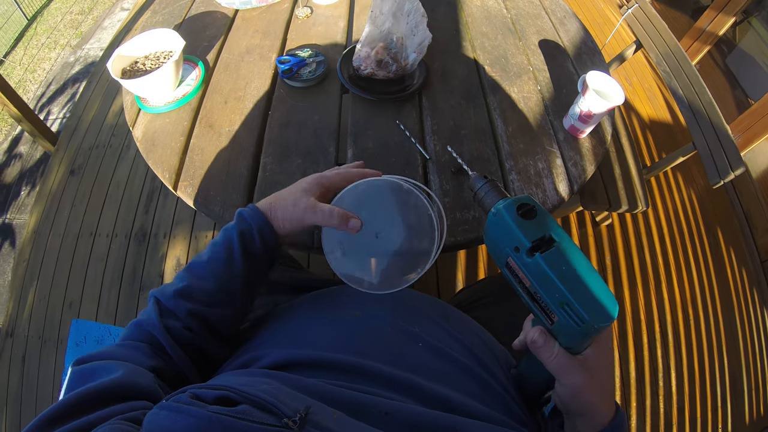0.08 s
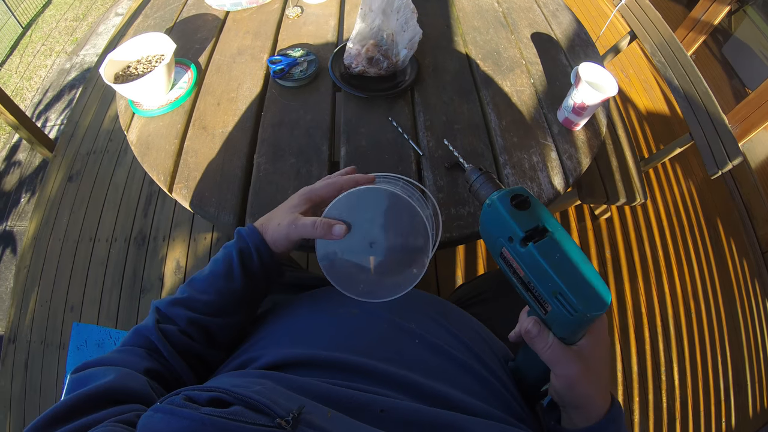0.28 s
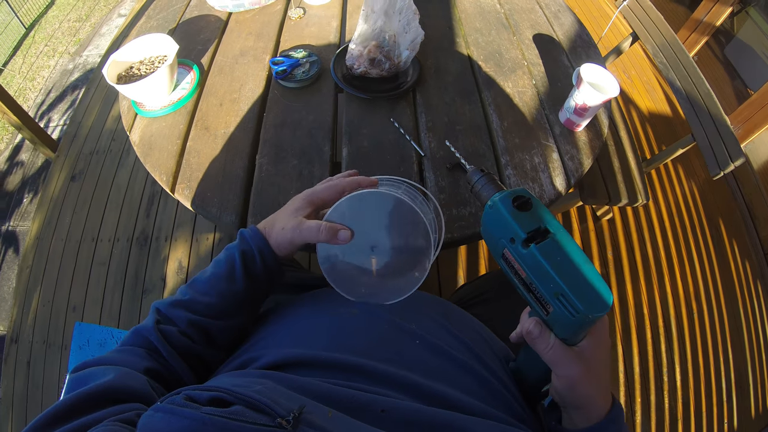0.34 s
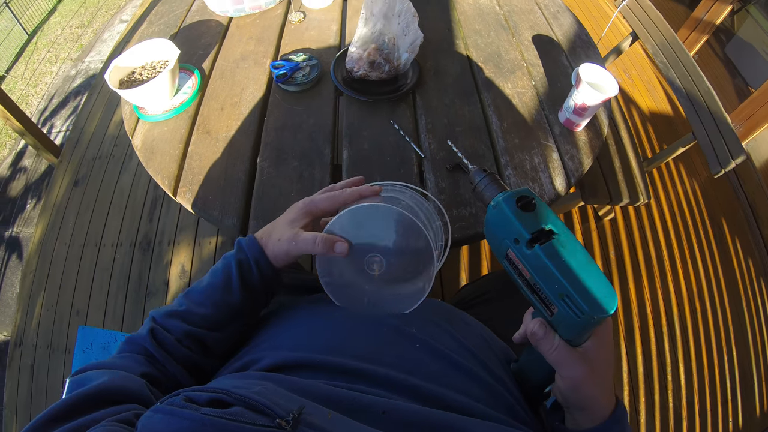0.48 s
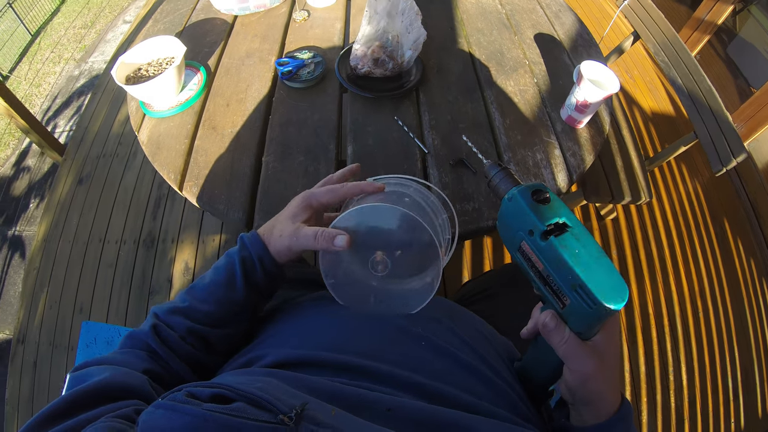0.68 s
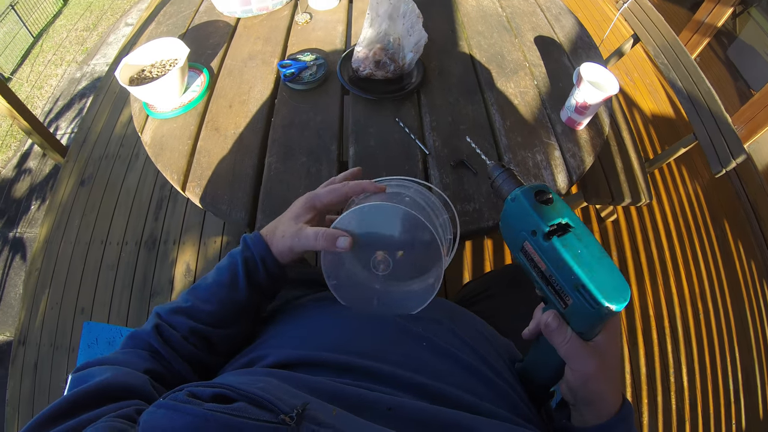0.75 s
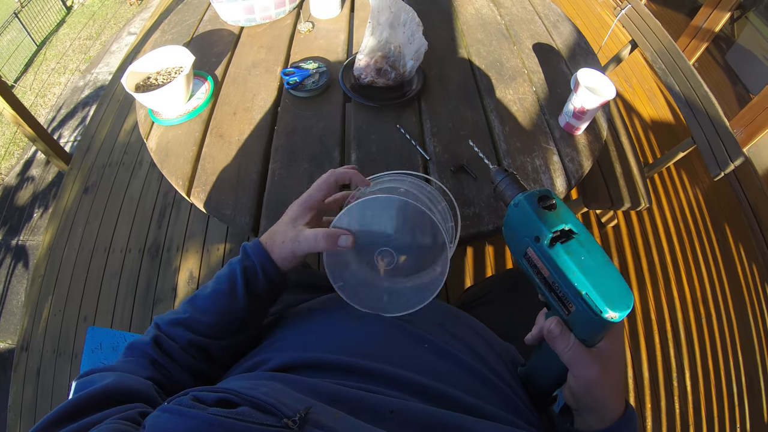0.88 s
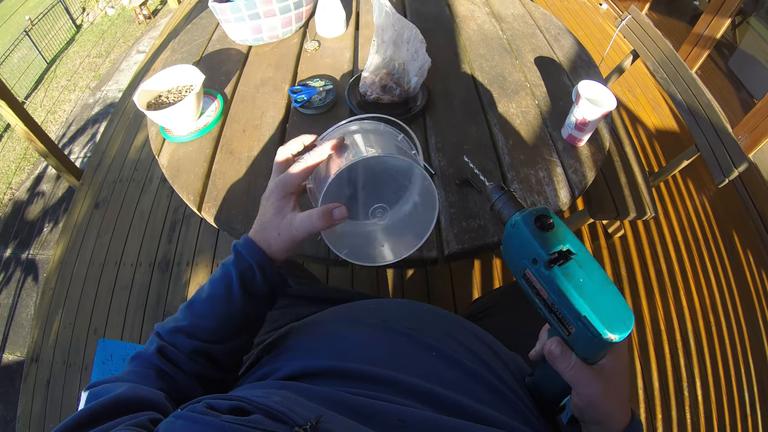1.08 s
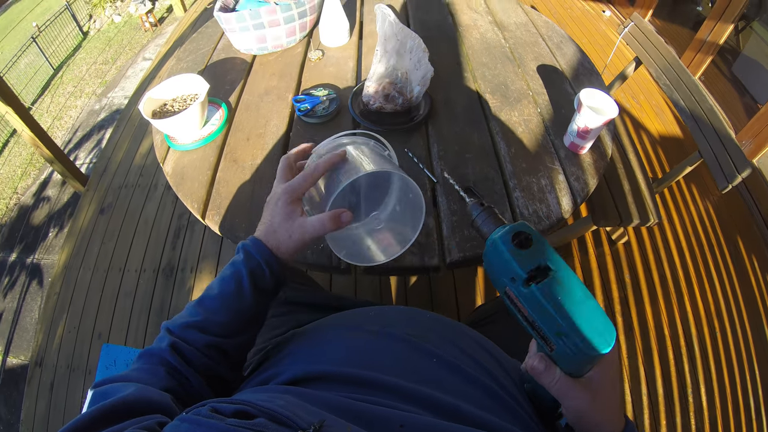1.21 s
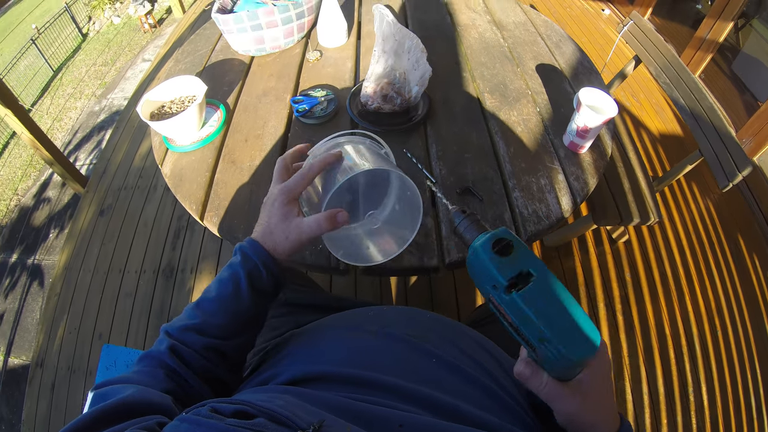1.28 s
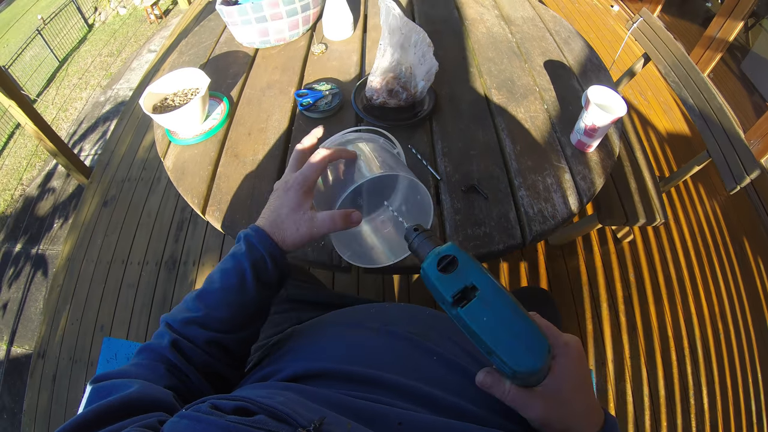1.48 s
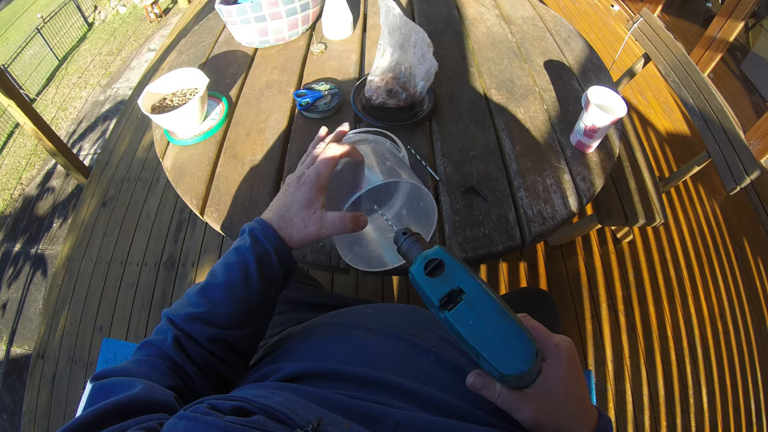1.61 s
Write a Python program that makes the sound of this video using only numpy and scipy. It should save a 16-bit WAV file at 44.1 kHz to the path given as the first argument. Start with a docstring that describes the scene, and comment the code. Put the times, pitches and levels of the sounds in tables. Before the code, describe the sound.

A thin plastic tub is handled at a wooden garden table, close and muffled. It knocks and rebounds lightly, slides and rubs under the fingers, then takes one harder, hollow knock and a last soft rub, over faint wind.

```python
"""A thin plastic tub is handled at a wooden garden table, heard close up and muffled.
Over faint wind, hiss and a thin whine, it is tapped and knocked, and rebounds lightly.
It then slides, rubs and creaks under the fingers, while a low drone swells.
At 1.28 s a hard knock sets wall and base ringing, and the automatic gain dips and recovers.
A last soft rub and scrape follow."""
import sys
import numpy as np
from scipy import signal
from scipy.fft import rfft, irfft
from scipy.io import wavfile
from scipy.ndimage import uniform_filter1d

SR = 44100
rng = np.random.default_rng(int(sys.argv[2]) if len(sys.argv) > 2 else 0)


def generate_wav(sig):
    """Save sig (samples, or channels by samples) to the path in sys.argv[1] as 16-bit PCM at SR."""
    pcm = np.round(np.clip(np.atleast_2d(sig).T, -1, 1) * 32767).astype(np.int16)
    wavfile.write(sys.argv[1], SR, pcm)


N = 72765

# spectrum of wind and hiss (frequency [Hz], relative density [dB])
AIR_SPECTRUM = [(20, -6.5), (37, -7.5), (60, -11), (100, -6.5), (135, -11.5), (220, -7), (350, -17.5),
                (520, -15), (750, -18.5), (1050, -26.5), (2500, -31.5), (4500, -36), (7000, -41.5),
                (10000, -46.5), (13000, -51.5), (15000, -49)]
# envelope of the low drone (time [s], level [dB])
DRONE_LEVELS = [(0, -80), (0.65, -77), (0.8, -60), (1.2, -55), (1.35, -74), (1.65, -54)]
# sharp creaks of the plastic, and the bright click that opens the first knock at 0.0675 s (time [s], level
# [dB], frequency [Hz], bandwidth [Hz])
BRIGHT_TRANSIENTS = [(0.044, -65, 6800, 1600), (0.0675, -60, 7500, 2400), (0.328, -61, 4300, 450),
                     (1.004, -63, 3000, 4000), (1.169, -66, 6500, 4000), (1.281, -61, 6500, 3000),
                     (1.2975, -58, 6200, 1800)]
# fingers shifting their grip (start [s], duration [s], level [dB])
GRIP_SHIFTS = [(0.48, .15, -70.5), (0.703, 0.026, -69), (0.839, 0.037, -70), (1.001, 0.089, -70.5)]
# spectrum of the crackle under the fingers (frequency [Hz], relative density [dB])
CRACKLE_SPECTRUM = [(500, -5), (2500, 0.5), (5000, -11), (6500, 0.5), (8300, -16), (9500, -4), (11200, -20),
                    (12800, -2), (14000, -14), (15000, -13)]
# soft rubs on the wall (start [s], duration [s], level [dB], lower resonance [Hz], upper resonance [Hz])
RUB_STROKES = [(0.348, 0.107, -45, 458, 603), (1.47, .26, -53, 704, 808)]
# slides of the tub (start [s], duration [s], level [dB], rise time [s], level change by the end [dB])
SCRAPE_STROKES = [(-0.01, 0.11, -36, .005, 4), (0.518, 0.19, -38.5, 0.0089, -22),
                  (0.844, 0.19, -57, 0.015, -9), (1.486, .2, -59, 0.03, -5)]
# spectrum of the sliding tub (frequency [Hz], relative density [dB])
SCRAPE_SPECTRUM = [(40, -25.5), (130, -6.5), (300, -5.5), (470, 2.5), (750, -3), (950, -16), (1400, -29),
                   (2000, -29), (5000, -53), (15000, -82.5)]
# light finger taps, and a brief slip within the slide at 0.527 s (time [s], level [dB], flex frequency [Hz])
WALL_FLEXES = [(0.002, -24.5, 465), (0.016, -24.5, 407), (0.047, -26.5, 466), (0.327, -39.5, 565),
               (0.355, -38.5, 474), (0.495, -29.5, 420), (0.527, -59, 476), (0.587, -48, 453),
               (1.004, -38, 292), (1.472, -36.5, 133), (1.511, -36, 510)]
# spectrum of the clatter after a knock (frequency [Hz], relative density [dB])
CLATTER_SPECTRUM = [(30, -7.5), (130, -10.5), (220, -8.5), (330, 2), (450, 5), (780, -0.5), (950, -19),
                    (1400, -25), (2100, -31.5), (3000, -29.5), (5000, -39.5), (8000, -46.5), (15000, -71.5)]
# damping of that clatter (frequency [Hz], time to fall 60 dB [s])
CLATTER_DECAY = [(60, 0.6), (500, 0.34), (2000, 0.37), (8000, .15)]
# spectrum of the contact tick (frequency [Hz], relative density [dB])
TICK_SPECTRUM = [(50, -1.5), (1000, 11.5), (2000, 11), (4000, -1), (5500, -30), (8000, -27), (11000, -39),
                 (15000, -38.5)]
# modes of the tub's wall and base (frequency [Hz], relative level [dB], time to fall 60 dB [s])
WALL_MODES = [(360, -12, 0.056), (437.6, 5, 0.048), (486.4, 7, 0.1), (520, -20, 0.29), (620, -35, .2),
              (691.6, -7, 0.21), (785, -21, 0.4), (1012, -18, .06), (1211, -18.5, 0.066),
              (1814, -21, 0.048), (2784, -53, 0.04), (2940, -31, 0.072)]
BASE_MODES = [(153.6, 6, 0.17), (228.2, -13, 0.28)]
# knocks and rebounds (time [s], flex level [dB], flex frequency [Hz], push level [dB],
# wall ring gain [dB], base ring gain [dB], tick level [dB], clatter level [dB])
IMPACTS = [(0.0685, 0, 493, -21.5, -16, -34, -34.5, -21), (0.094, -20.5, 487, -56, -52, -72, -66, -29),
           (0.1205, -16.5, 550, -37, -45, -54, -40.5, -37), (0.4914, -28.5, 460, -36, -39, -46, -52, -38),
           (1.2801, -23, 317, -24, -56, -22.5, -46.5, -47), (1.2837, -10, 490, -39, -22.5, -28, -56, -31.5),
           (1.2968, -43, 560, -30, -29, -33.5, -55, -39.5)]

FLEX_S = 0.00603  # duration of one flex of the wall


def amp(db):
    """Converts a level in decibels to an amplitude ratio."""
    return 10 ** (np.asarray(db) / 20)


def unit(x):
    """Normalises a signal to rms 1."""
    return x / np.sqrt(np.mean(x ** 2) + 1e-20)


def read(points, hz):
    """Interpolates a table along log frequency."""
    f, value = np.transpose(points)
    return np.interp(np.log(hz + 1), np.log(f + 1), value)


def add(mix, s, sound):
    """Superposition: a sound adds to the mix from time s."""
    at = round(s * SR)
    sound = sound[max(-at, 0):]
    part = mix[max(at, 0):][:len(sound)]
    part += sound[:len(part)]


def colour(x, spectrum):
    """Linear filtering: weights a signal by a spectrum, at rms 1."""
    size = len(x) + 2048
    gain = amp(read(spectrum, np.fft.rfftfreq(size, 1 / SR)))
    return unit(irfft(rfft(x, size) * gain, size)[:len(x)])


def resonance(size, hz, width_hz):
    """A resonance driven by noise passes a narrow band, here at rms 1."""
    detuning = 2 * (np.fft.rfftfreq(N, 1 / SR) - hz) / width_hz
    return unit(irfft(rfft(rng.standard_normal(N)) / (1 + detuning ** 2), N)[:size])


def pulse(t, peak_s):
    """A critically damped response: it rises to 1 at peak_s, then decays."""
    return t / peak_s * np.exp(1 - t / peak_s)


def background():
    """Amplitude modulation: wind and hiss waver slightly, a drone swells, a whine pulses evenly."""
    t = np.arange(N) / SR
    bands = signal.stft(rng.standard_normal(N), nperseg=1024)[2]
    patches = uniform_filter1d(rng.standard_normal(bands.shape), size=12, axis=0)
    patch_db = 0.5 * unit(uniform_filter1d(patches, size=12, axis=1))
    air = colour(signal.istft(bands * amp(patch_db))[1][:N], AIR_SPECTRUM)
    drone = amp(np.interp(t, *np.transpose(DRONE_LEVELS))) * resonance(N, hz=95, width_hz=29)
    whine_hz, pulsing_hz = 7477, 14
    pulsing = 1 + np.tanh(2 * np.sin(2 * np.pi * pulsing_hz * t) + .5)
    whine = np.sin(2 * np.pi * whine_hz * t) + 0.38 * resonance(N, whine_hz, width_hz=120)
    return amp(-51) * air + drone + amp(-81) * unit(pulsing * whine)


def slips(size, per_s):
    """Stick-slip friction: a random train of impulses of uneven size."""
    impulses = (rng.random(N) < per_s / SR) * rng.choice([-1, 1], N)
    strength_db = 1.5 * np.minimum(rng.exponential(1, N), 3)
    return (impulses * amp(strength_db))[:size]


def creaks():
    """Brief transients: the plastic creaks brightly, a bright click opens the first knock, and sparse slips
    crackle under the fingers."""
    out, t = np.zeros(N), np.arange(0, .04, 1 / SR)
    for s, db, hz, width_hz in BRIGHT_TRANSIENTS:
        add(out, s, amp(db) * pulse(t, peak_s=.002) * resonance(len(t), hz, width_hz))
    for s, length, db in GRIP_SHIFTS:
        add(out, s, amp(db) * colour(slips(int(length * SR), per_s=130), CRACKLE_SPECTRUM))
    return out


def rubs():
    """Forced vibration: gentle friction drives two resonances of the wall."""
    out = np.zeros(N)
    width_hz, ramp_s = 89, 0.015
    for s, length, db, low_hz, high_hz in RUB_STROKES:
        t = np.arange(0, length, 1 / SR)
        tone = resonance(len(t), low_hz, width_hz) + amp(-6.5) * resonance(len(t), high_hz, width_hz)
        envelope = np.minimum(np.minimum(t, length - t) / ramp_s, 1)
        add(out, s, amp(db) * envelope * tone)
    return out


def scrapes():
    """Source and filter: the dense slips of sliding are coloured by the tub's response."""
    out = np.zeros(N)
    release_s = 0.0071
    for s, length, db, rise_s, change_db in SCRAPE_STROKES:
        t = np.arange(0, length, 1 / SR)
        ramps = np.minimum(t / rise_s, 1) * np.minimum((length - t) / release_s, 1)
        envelope = ramps * amp(db + change_db * (t / length) ** 2)
        add(out, s, envelope * colour(slips(len(t), per_s=900), SCRAPE_SPECTRUM))
    return out


def flex(hz):
    """Elastic restoring force: the wall gives and springs back in a few heavily damped swings."""
    t = np.arange(0, FLEX_S, 1 / SR)
    return -np.sin(np.pi * t / FLEX_S) ** 2 * np.cos(2 * np.pi * hz * (t - FLEX_S / 2))


def taps():
    """Elastic deflection: a light finger tap, or a brief slip within a slide, only flexes the wall."""
    out = np.zeros(N)
    for s, db, hz in WALL_FLEXES:
        add(out, s, amp(db) * flex(hz))
    return out


def clatter(t):
    """Frequency-dependent damping: each band of the rattle of tub and table dies at its own rate."""
    noise = colour(rng.standard_normal(len(t)), CLATTER_SPECTRUM)
    hz, when, bands = signal.stft(noise, SR, nperseg=256)
    decay = np.exp(-np.log(1000) * when / read(CLATTER_DECAY, hz)[:, None])
    return signal.istft(bands * decay, SR)[1][:len(t)]


def ring(modes, t):
    """Free vibration: a struck body sounds as a sum of exponentially decaying modes."""
    return sum(amp(db) * np.exp(-np.log(1000) * t / t60) * np.sin(2 * np.pi * hz * t)
               for hz, db, t60 in modes)


def knocks():
    """Impact excitation: a tick, a low push and a flex of the wall, then ringing and clatter."""
    out, t = np.zeros(N), np.arange(SR // 2) / SR
    build_up = 1 - np.exp(-(2 * t / FLEX_S) ** 2)
    push = -np.gradient(pulse(t, peak_s=0.0027) ** 3)
    push /= abs(push).max()
    for s, flex_db, flex_hz, push_db, wall_db, base_db, tick_db, clatter_db in IMPACTS:
        tick = colour(rng.standard_normal(len(t)), TICK_SPECTRUM) * pulse(t, peak_s=0.0013)
        ringing = amp(wall_db) * ring(WALL_MODES, t) + amp(base_db) * ring(BASE_MODES, t)
        body = ringing + amp(clatter_db) * clatter(t)
        add(out, s, amp(push_db) * push + amp(tick_db) * tick + build_up * body)
        add(out, s, amp(flex_db) * flex(flex_hz))
    return out


def scene():
    """Superposition: the pressures of surroundings and tub add at one microphone."""
    return (knocks() + taps() + scrapes() + rubs() + creaks() + background())[None]


def record(dry):
    """Compression: the gain dips after a loud knock and recovers slowly; a low-pass limits the band."""
    threshold_db, slope, release_db_per_s, cutoff_hz = -23.5, 0.37, 39.5, 15300
    power_db = 10 * np.log10(signal.lfilter(*signal.butter(1, 30, fs=SR), dry[0] ** 2) + 1e-12)
    fall_db = np.arange(N) / SR * release_db_per_s
    held_db = np.maximum.accumulate(power_db + fall_db) - fall_db  # jumps to each peak, then sinks
    excess_db = np.maximum(held_db - threshold_db, 0)
    reduction_db = slope * signal.lfilter(*signal.butter(1, 5, fs=SR), excess_db)
    low_pass = signal.firwin(511, cutoff_hz, window=("kaiser", 9), fs=SR)
    return signal.oaconvolve(dry / amp(reduction_db), low_pass[None], "same")


dry = scene()
out = record(dry)
generate_wav(out)
```